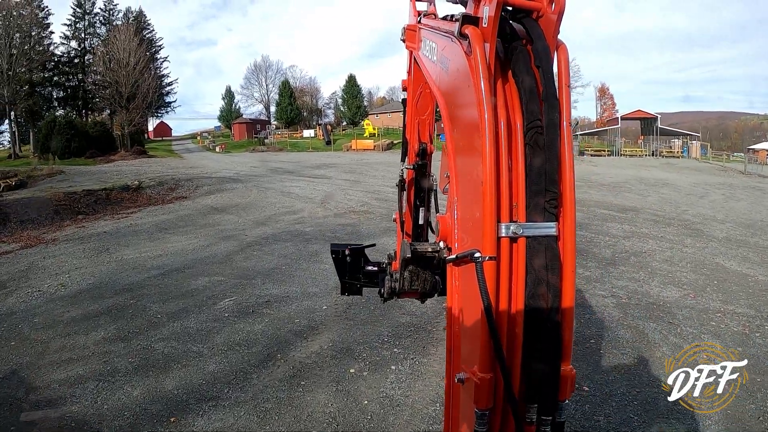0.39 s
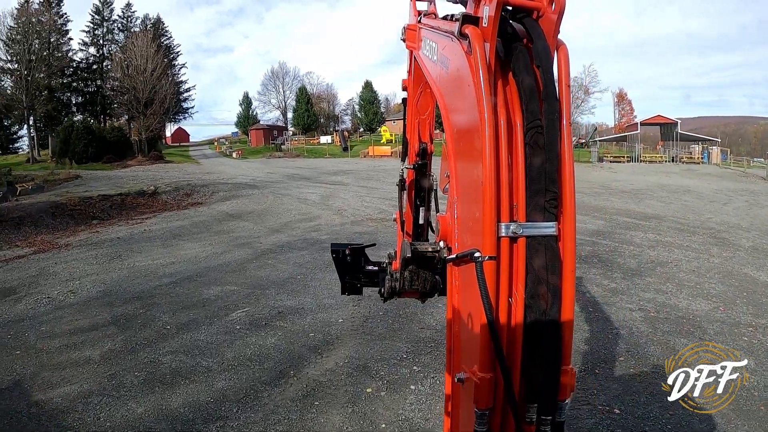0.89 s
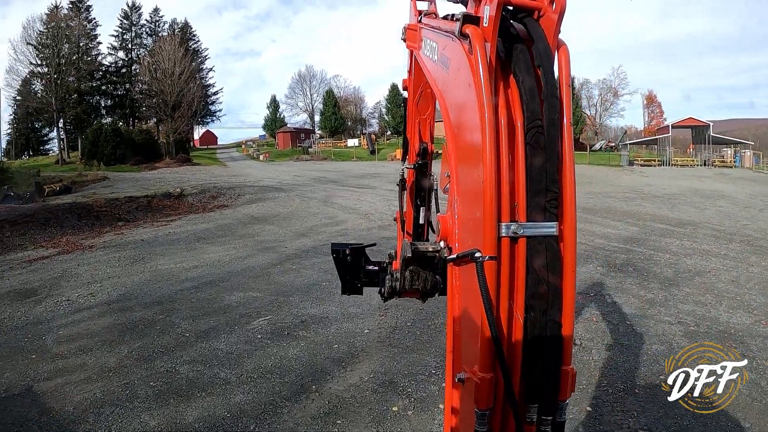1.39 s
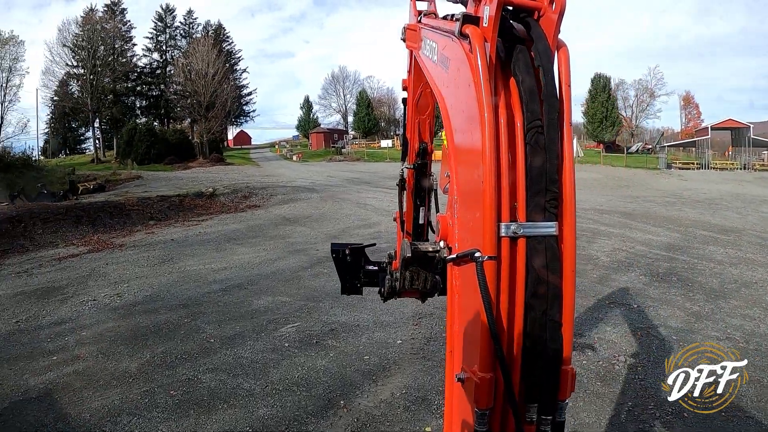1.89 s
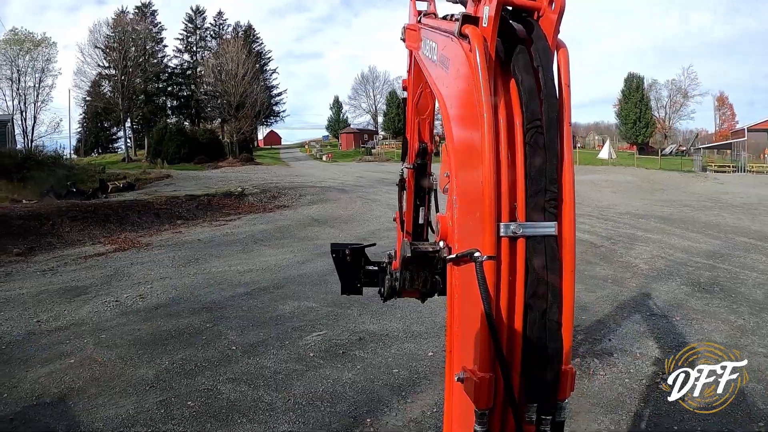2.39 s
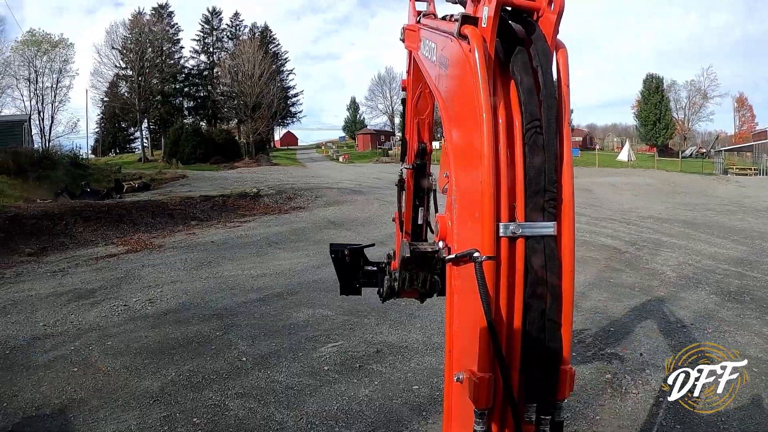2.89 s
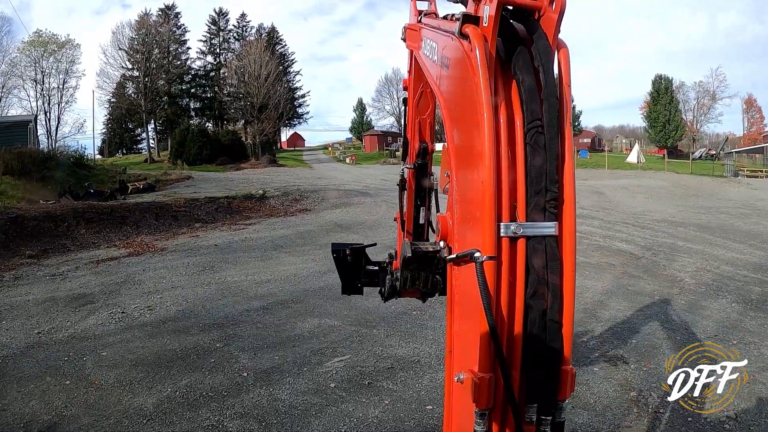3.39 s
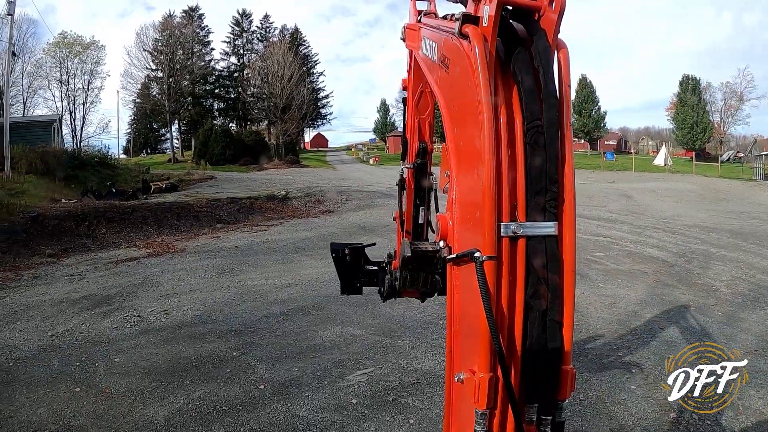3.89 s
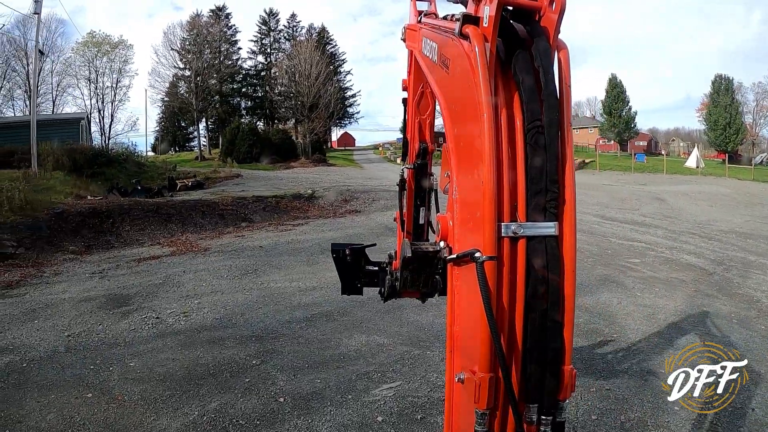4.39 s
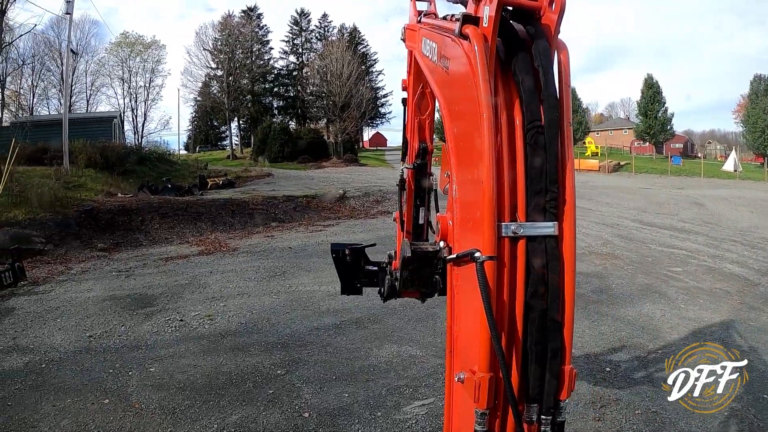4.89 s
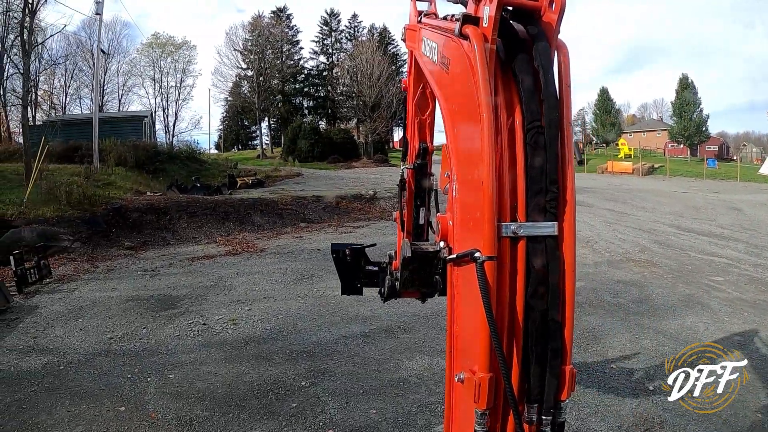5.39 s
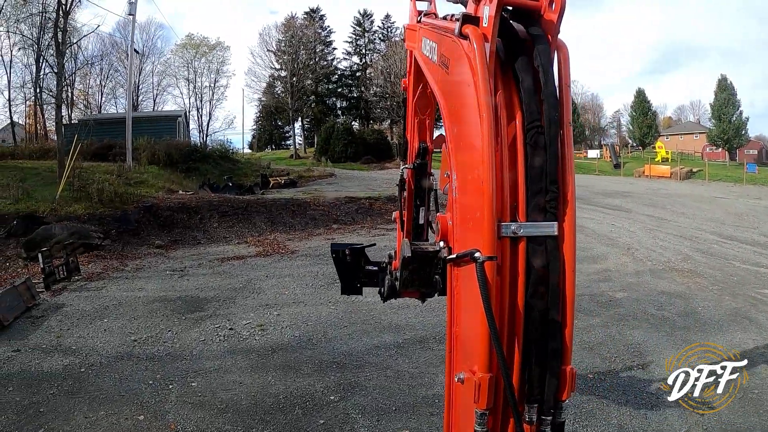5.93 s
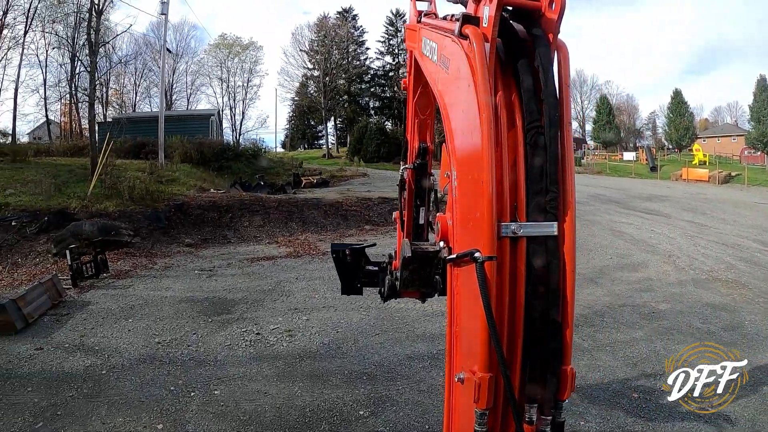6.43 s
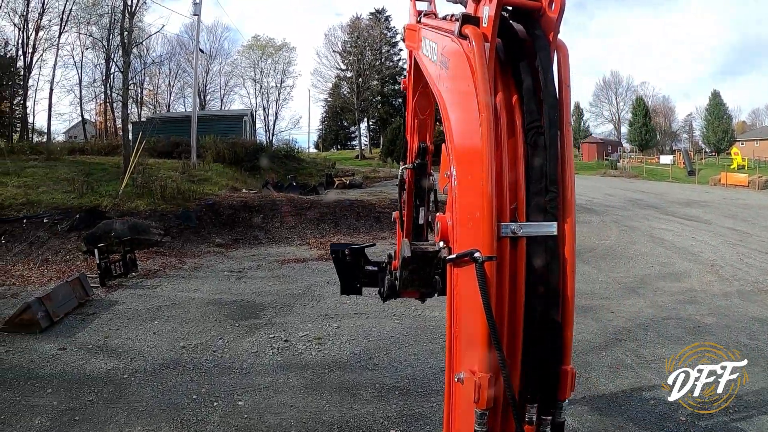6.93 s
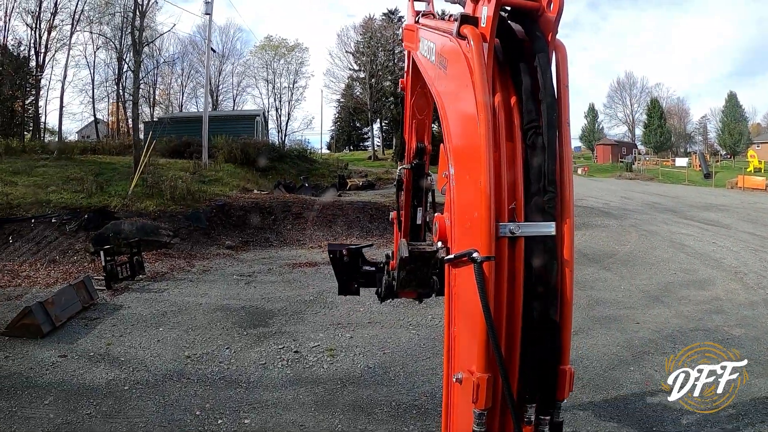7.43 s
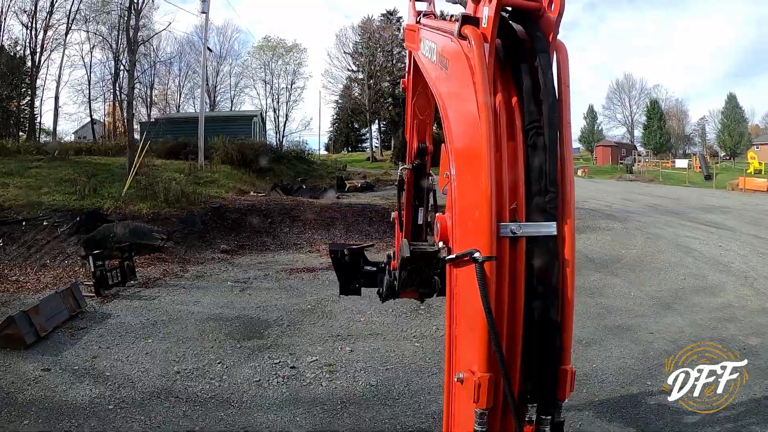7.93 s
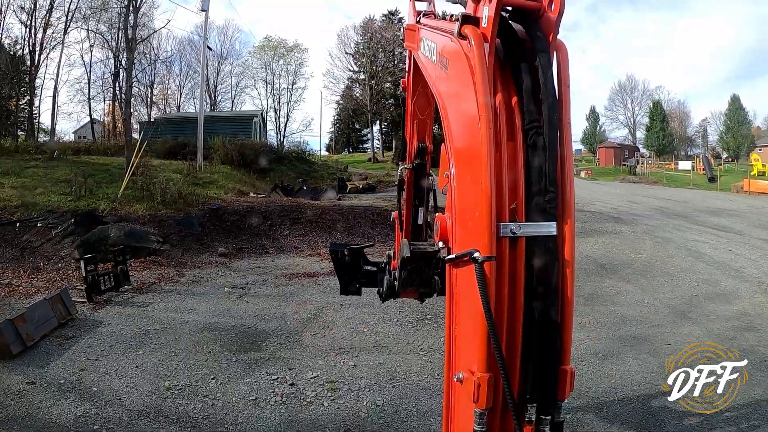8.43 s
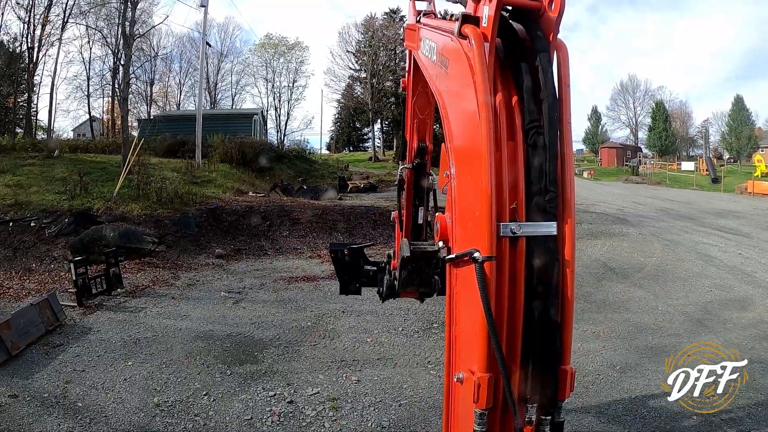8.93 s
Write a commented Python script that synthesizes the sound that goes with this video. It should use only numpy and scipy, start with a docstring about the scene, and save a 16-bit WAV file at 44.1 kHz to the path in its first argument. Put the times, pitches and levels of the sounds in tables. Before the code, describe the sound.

A small three-cylinder diesel runs at a steady speed, heard close from an excavator cab outdoors. Deep firing throb, pump hum and whine, fan and valve clatter blend with rushing air. Loose parts and a panel rattle briefly at first, then the drone smooths out during the swing. Near the end the frame shudders and the rattling returns strongly, then thins to a few taps.

```python
"""On the cab of a small three-cylinder diesel excavator, two microphone ports hear it run at a held speed.
Firing thump, pump tones, fan and valve clatter are phase-locked or geared to the four-stroke cycle.
The frame shakes at its own low pitch, gaining on the thump near 7.8 s as the swing stops; a loose part,
a smaller part and a cab panel are struck at listed times and ring as damped modes.
Noise with shaped spectra gives the rumble, the booming cab walls and the rush of air."""
import sys
import numpy as np
from scipy import signal
from scipy.io import wavfile
from scipy.ndimage import uniform_filter1d

SR = 44100
rng = np.random.default_rng(int(sys.argv[2]) if len(sys.argv) > 2 else 0)


def store_pcm(level_fs):
    """Save levels as 16-bit WAV."""
    pcm = np.round(np.clip(level_fs, -1, 1) * 32767).astype(np.int16)
    wavfile.write(sys.argv[1], SR, np.atleast_2d(pcm).T)


def gain_from_db(level_db):
    """Turn a decibel level (scalar or array-like) into a linear amplitude factor."""
    decades = np.asarray(level_db, float) / 20
    return 10 ** decades


N = 399546
T = np.arange(N) / SR
LEFT_LAG_S = 4e-5  # the left port lies a little farther from the engine


def curve(rows):
    """Linear interpolation in time: every column of a table, read at each sample."""
    s, *columns = np.transpose(rows)
    return [np.interp(T, s, c) for c in columns]


def read(points, hz):
    """Interpolation over pitch: a spectrum table read on a log-frequency axis."""
    f, value = np.transpose(points)
    return np.interp(np.log(hz + 1), np.log(f + 1), value)


def evened(x):
    """Power normalisation: the signal scaled to rms 1."""
    return x / np.sqrt(np.mean(x ** 2) + 1e-20)


def drift(hz):
    """Slow random modulation: a sum of sines up to hz, random in phase, rms 1."""
    t = T[::64]
    rates = np.geomspace(hz / 30, hz, 12)
    slow = sum(np.sin(2 * np.pi * (f * t + rng.random())) / np.sqrt(f) for f in rates)
    return np.interp(T, t, evened(slow))


def tone(turns, db, lean_db, lag_turns=0.):
    """Simple harmonic motion: a sine of rms level db, split in level and phase between the ports."""
    side = np.array([[.5], [-.5]])
    phase = 2 * np.pi * (turns - side * lag_turns)
    return np.sqrt(2) * gain_from_db(db + side * lean_db) * np.sin(phase)


# likeness of the noise at the two ports: (frequency [Hz], correlation [0 to 1])
LIKENESS = [(60, 0.96), (300, 1), (520, 0.94), (890, 0.8), (1520, 0.97), (2600, 0.45), (4000, 0.69),
            (9000, 0.14)]
# level difference between the ports: (frequency [Hz], left minus right [dB])
PORT_LEAN = [(60, 1.0), (200, .5), (320, 2.0), (740, 2.8), (1700, 1.6), (5000, 1.2), (10000, .2)]


def noise(spectrum, size, patchy_db, patch):
    """Partial coherence: random short-time spectra in drifting patches (bins, frames), partly alike."""
    hop, hz = size // 4, np.fft.rfftfreq(size, 1 / SR)
    a, b, c, d, patches = rng.standard_normal((N // hop + 5, len(hz), 5)).T
    patches = uniform_filter1d(patches, size=patch[0], axis=0)
    patches = evened(uniform_filter1d(patches, size=patch[1], axis=1))
    same = np.clip(read(LIKENESS, hz), 0, 1)[:, None]
    left = a + 1j * b
    lead = np.exp(2j * np.pi * hz * LEFT_LAG_S)[:, None]
    right = same * left * lead + np.sqrt(1 - same ** 2) * (c + 1j * d)
    lean = gain_from_db(read(PORT_LEAN, hz) / 2)[:, None]
    colour = gain_from_db(read(spectrum, hz)[:, None] + patchy_db * patches)
    z = np.array([left * lean, right / lean]) * colour
    return evened(signal.istft(z, nperseg=size, noverlap=size - hop)[1][:, :N])


def struck(events, modes, bounce_s):
    """Modal impact: each blow is a short swell of random bounces that excites damped modes."""
    at, db = np.transpose(events)
    blows = np.zeros(N)
    blows[np.round(at * SR).astype(int)] = gain_from_db(db)
    t = np.arange(3000) / SR
    swell = t / bounce_s * np.exp(1 - t / bounce_s)
    bounces = rng.standard_normal((N, 2)).T * signal.oaconvolve(blows, swell)[:N]
    body = sum(gain_from_db(mode_db - 60 * t / t60) * np.sin(2 * np.pi * hz * t) for hz, mode_db, t60 in modes)
    body *= 1 - np.exp(-(t / .0007) ** 2)  # softened onset
    body = body[None] / np.linalg.norm(body)
    at_ports = bounces[0] + .5 * bounces  # the ports hear slightly different bounces
    return signal.oaconvolve(at_ports, body, axes=1)[:, :N]


# load on the hydraulics, highest at 7.7 s and lowest at 8.3 s: (time [s], relative level [dB])
LOAD_CURVE = [(0, 1.5), (.8, 0), (1.6, -0.5), (2.6, -2), (3.9, 2), (4.7, -2.5), (5.5, 0.5), (6.3, 4),
              (7.1, 2), (7.7, 4.5), (8.3, -5.5), (9.06, 2)]


def hydraulic_load():
    """Load modulation: the changing load that raises or lowers the booms and the upper pump tone."""
    return curve(LOAD_CURVE)[0]


# effort of the swing drive: (time [s], gain of locked tones [dB], gain of rush [dB])
SWING_EFFORT = [(0, -1.5, 1), (.45, -0.5, 0.7), (1.8, 0, 0.5), (3.4, -2, -0.2), (4.2, 0.5, 1), (5, -1, 0.1),
                (7.2, -0.5, 1), (7.6, -2, .5), (7.9, -1.5, 1), (8.3, -1, -0.5), (9.06, -2, 1)]


def swing_effort():
    """Effort modulation: the gains that the swing drive gives to the locked tones and the rush."""
    return curve(SWING_EFFORT)


# frame rumble, lower and upper wall boom, a spectrum each: (frequency [Hz], relative density [dB per Hz])
BOOM_SPECTRA = [
    [(8, -18.5), (20, -9.5), (40, -0.5), (70, 2), (85, -26), (113, -4), (135, -15), (300, -21), (400, -17),
     (550, -37.5), (2000, -130)],
    [(120, -48.5), (145, -12), (160, 7.5), (175, 6), (190, -12), (230, -57), (400, -130)],
    [(160, -56.5), (200, 1.5), (240, -2.5), (275, 0), (310, -20.5), (380, -71), (600, -130)],
]
# the same three in order: (level [dB], share of load [dB per dB], slow swell [dB])
BOOM_LEVELS = [(-25, 0.08, 0.5), (-33, 0.84, 0.5), (-34, 0.58, 1.5)]


def booms(load_db):
    """Structure-borne resonance: frame rumble and wall booms follow the load and swell slowly."""
    total = 0
    for spectrum, (db, share, swell_db) in zip(BOOM_SPECTRA, BOOM_LEVELS):
        gain = gain_from_db(db + share * load_db + swell_db * drift(1.2))
        total = total + gain * noise(spectrum, size=4096, patchy_db=0.6, patch=(10, 8))
    return total


# air rush and mechanical clatter: (frequency [Hz], relative density [dB per Hz])
CLATTER_SPECTRUM = [(250, -22.5), (480, -4.5), (600, -8.5), (700, -15.5), (775, -6.5), (845, -15),
                    (890, -12.5), (935, -9.5), (1060, -9.5), (1240, -12.5), (1330, -11), (1500, -13.5),
                    (1680, -14.5), (1800, -15.5), (2030, -17.5), (2300, -23.5), (2600, -27), (3200, -25.5),
                    (3600, -27.5), (4900, -33)]
# the top of the air rush, fading towards the treble: (frequency [Hz], relative density [dB per Hz])
RUSH_TOP_SPECTRUM = [(5500, -38), (7000, -40), (8500, -42), (9300, -51), (10400, -53), (11000, -59),
                     (12300, -60), (14000, -70), (16000, -85)]


def clatter(cycles, rush_db):
    """Amplitude-modulated turbulence: the rush of air and valve gear puffs at each firing."""
    puff = 1 + .2 * np.exp(-((3 * cycles + .3) % 1) / .2)
    puff = uniform_filter1d(uniform_filter1d(puff, size=60), size=60)  # each puff takes a moment to rise
    rush = noise(CLATTER_SPECTRUM + RUSH_TOP_SPECTRUM, size=2048, patchy_db=1.8, patch=(3, 24))
    return gain_from_db(-37 + rush_db + 0.2 * drift(2.5)) * evened(rush * puff)


# ticks of the small part: (time [s], relative level [dB])
TICK_TIMES = [(0.039, -47), (7.946, -50), (7.962, -52), (8.024, -51), (8.1032, -51), (8.1846, -53),
              (8.2635, -52.5)]
# its modes: (frequency [Hz], relative level [dB], 60 dB decay time [s])
SMALL_PART_MODES = [(4300, -3, .004), (5200, 0, .004), (5900, -3, .004), (6600, -4, .004), (7600, -9, .004)]


def small_part_ticks():
    """Modal ringing of a light body: high modes that die within milliseconds."""
    return gain_from_db(-6.0) * struck(TICK_TIMES, SMALL_PART_MODES, bounce_s=0.0022)


# knocks of the loose part: (time [s], relative level [dB])
LOOSE_PART_TAPS = [(.037, -28), (.11, -25), (.15, -29), (.186, -26), (.23, -29), (.262, -24), (.325, -25.5),
                   (7.488, -26), (7.56, -29), (7.639, -27), (7.678, -28), (7.72, -25), (7.759, -22.5),
                   (7.796, -26), (7.838, -24.5), (7.881, -23.5), (7.919, -25), (7.96, -22), (7.998, -25),
                   (8.045, -25), (8.078, -25), (8.122, -26), (8.159, -27), (8.203, -28), (8.709, -27),
                   (8.792, -28), (8.909, -26.5), (8.951, -28), (8.993, -28)]
# its modes: (frequency [Hz], relative level [dB], 60 dB decay time [s])
LOOSE_PART_MODES = [(750, -4, .015), (1050, -2, .012), (1400, 0, .014), (1700, -1, .01), (2100, -5, .01),
                    (2800, -11, .008), (3400, -12, .008), (4300, -16, .006), (5200, -21, .005)]


def loose_part_knocks():
    """Modal ringing under repeated impact: the loose part rattles in the middle of the spectrum."""
    return gain_from_db(-13) * struck(LOOSE_PART_TAPS, LOOSE_PART_MODES, bounce_s=.005)


# thuds of the cab panel: (time [s], relative level [dB])
PANEL_THUDS = [(.02, -26), (.07, -26), (.112, -21), (.135, -24), (.186, -22), (.22, -26), (.262, -25),
               (.325, -26), (.758, -27), (.841, -29), (5.331, -28), (7.367, -29), (7.68, -28), (7.72, -27),
               (7.76, -27), (7.796, -24), (7.838, -26), (7.881, -24), (7.92, -26), (7.96, -23), (8.0, -26),
               (8.045, -24), (8.08, -27), (8.12, -27)]
# its modes: (frequency [Hz], relative level [dB], 60 dB decay time [s])
PANEL_MODES = [(420, -1, .05), (470, 0, .05), (530, -3, .04), (600, -7, .03)]


def panel_thuds():
    """Plate resonance: low, longer modes of the cab panel answer each thud."""
    return gain_from_db(-6.5) * struck(PANEL_THUDS, PANEL_MODES, bounce_s=.004)


# the frame on its mounts: (time [s], frequency [Hz], relative level [dB])
FRAME_SHAKE = [(0, 24.9, -29), (1.05, 25.07, -36.5), (1.4, 25.9, -20.5), (1.9, 25.5, -22),
               (2.6, 25.16, -19), (3, 25.17, -17), (3.25, 25.13, -26.5), (3.5, 25.4, -13),
               (3.87, 26.05, -26), (4.1, 25.94, -17), (4.4, 24.91, -18), (4.8, 25.67, -15.5),
               (5.7, 24.76, -24), (6, 24.57, -20.5), (6.7, 24.7, -27), (7.3, 24.47, -18.5),
               (7.55, 24.42, -17.5), (7.8, 24.91, -8), (8.45, 25.47, -17), (9.06, 26.14, -14)]


def frame_shake():
    """Mass-spring oscillation: the frame sways on its mounts as one low sine of wandering pitch."""
    shake_hz, shake_db = curve(FRAME_SHAKE)
    return tone(np.cumsum(shake_hz) / SR, shake_db + 0.46 * drift(6.9), 1.0)


# engine speed: (time [s], four-stroke cycle rate [Hz])
CYCLE_RATE = [(0.0, 15.698), (0.3, 15.705), (0.6, 15.709), (0.9, 15.708), (1.2, 15.716), (1.5, 15.743),
              (1.8, 15.775), (2.1, 15.792), (2.4, 15.789), (2.7, 15.771), (3.0, 15.75), (3.3, 15.726),
              (3.6, 15.706), (3.9, 15.71), (4.2, 15.738), (4.5, 15.764), (4.8, 15.77), (5.1, 15.752),
              (5.4, 15.73), (5.7, 15.72), (6.0, 15.718), (6.3, 15.718), (6.6, 15.719), (6.9, 15.713),
              (7.2, 15.691), (7.5, 15.664), (7.8, 15.648), (8.1, 15.641), (8.4, 15.637), (8.7, 15.628),
              (9.06, 15.618)]


def engine_cycles():
    """Phase as the integral of frequency: four-stroke cycles turned so far."""
    return np.cumsum(curve(CYCLE_RATE)[0]) / SR


# strong tones locked to the cycle, from pumps, valves and knock: (multiple of the cycle, relative level [dB])
STRONG_ORDERS = [(2, -35), (6, -45), (9, -50), (10, -40), (15, -39), (16, -40), (19, -50), (20, -35),
                 (21, -49), (22, -50), (23, -52), (27, -51), (28, -50), (30, -54), (32, -52), (34, -57),
                 (36, -46.5), (37, -54), (38, -51), (39, -47), (40, -58), (41, -59), (42, -50), (43, -51),
                 (44, -54), (45, -50.5), (46, -60), (47, -60), (48, -63), (50, -53), (52, -53), (53, -58),
                 (55, -55), (56, -57), (57, -58), (59, -61), (60, -57), (62, -59), (65, -58), (66, -52),
                 (67, -53), (68, -57), (69, -62), (70, -62), (72, -54), (77, -63), (80, -57), (81, -65),
                 (84, -57), (86, -61), (92, -65), (93, -57), (96, -65), (100, -55), (106, -68), (107, -64),
                 (108, -60), (112, -68), (114, -64), (116, -65), (117, -61), (118, -66), (121, -69),
                 (122, -65), (124, -63), (128, -70), (129, -70), (130, -60), (132, -72), (133, -69),
                 (136, -73), (140, -73), (150, -76), (153, -76), (154, -78), (167, -80), (175, -74),
                 (180, -75), (183, -78), (201, -79), (209, -78)]
# injector, valve and combustion knocks: (place in the cycle [share], relative level [dB])
CYCLE_KNOCKS = [(.0917, -6), (.2215, -6), (.2387, -6), (.3391, -6), (.3719, -6), (.4366, -6), (.612, -6),
                (.6675, -6), (.9497, -2)]


def engine_pattern(cycles):
    """Fourier series of a periodic source: one cycle repeats, its knocks timing strong and faint tones."""
    angle, out = np.arange(8192) / 8192, np.zeros((2, N))
    cycle_hz = CYCLE_RATE[1][1]
    at, knock_db = np.transpose(CYCLE_KNOCKS)
    strong = dict(STRONG_ORDERS)
    orders = sorted(set(strong) | set(range(25, 290)))
    chance = rng.standard_normal((len(orders), 3))
    groups = 4  # neighbouring tones swell apart from one another
    for g in range(groups):
        shape = 0
        for k, (late, lean, size) in list(zip(orders, chance))[g::groups]:
            hz = k * cycle_hz
            faint_db = -59 + read(CLATTER_SPECTRUM, hz) + 3.5 * size  # coloured like the clatter
            knock_sum = np.sum(gain_from_db(knock_db) * np.exp(-2j * np.pi * k * at))
            start = np.angle(knock_sum) / (2 * np.pi)
            smear = .04 if k in strong else .2  # random phase [turns]
            lean_db = read(PORT_LEAN, hz) + 2.5 * lean * min(hz / 500, 1)
            shape = shape + tone(k * angle + start + smear * late, strong.get(k, faint_db),
                                 lean_db, hz * LEFT_LAG_S)
        played = [np.interp(cycles % 1, angle, port, period=1) for port in shape]
        out += gain_from_db(0.9 * drift(6.5)) * np.array(played)
    return out


# pressure pulse of the six-tooth pump: (time [s], level [dB])
PUMP_PULSE = [(0, -27.5), (1, -29.5), (2.4, -30), (3.3, -31.5), (3.9, -27), (4.4, -31.5), (5.1, -31.5),
              (5.5, -27.5), (6.2, -30), (6.6, -26), (7.05, -25.5), (7.3, -32.5), (8, -30.5), (8.5, -34),
              (9.06, -32)]


def engine_tones(cycles, load_db):
    """Order tones: three firings a cycle, a six-tooth pump at crank speed, its octave, a belt-driven fan."""
    tooth_db = curve(PUMP_PULSE)[0]
    octave_db = -28.5 + 0.33 * load_db + .7 * drift(3)  # a third of a dB for each dB of load
    firing = tone(3 * cycles - .21 + .02 * drift(12), -15 + .5 * drift(10), 1.0, lag_turns=.003)
    tooth = tone(12 * cycles - .22 + .015 * drift(15), tooth_db + .8 * drift(12), .7)
    octave = tone(24 * cycles + 1 / 4, octave_db + 0.8 * drift(12), 1.9, lag_turns=0.022)
    # belt-driven, so not a whole multiple
    fan = tone(13.9 * cycles + .05 * drift(4), -41 + 1.5 * drift(3), .7)
    return firing + tooth + octave + fan


def scene():
    """Superposition: all sources add at the two microphone ports."""
    cycles, load_db = engine_cycles(), hydraulic_load()
    tones_db, rush_db = swing_effort()
    background = booms(load_db) + clatter(cycles, rush_db)
    rattles = small_part_ticks() + loose_part_knocks() + panel_thuds()
    engine = gain_from_db(tones_db) * engine_pattern(cycles) + engine_tones(cycles, load_db)
    return background + rattles + frame_shake() + engine


def levelled_bass(x):
    """Automatic gain control: the smoothed power of the bass alone is held at one level."""
    bass_hz, bass_db, hold_s = 61, -15, 0.11
    bass = signal.sosfiltfilt(signal.butter(4, bass_hz, fs=SR, output="sos"), x)
    span = int(hold_s * SR)
    power = uniform_filter1d(uniform_filter1d((bass ** 2).mean(0), span), span)
    return x + bass * (gain_from_db(bass_db) / np.sqrt(power + 1e-9) - 1)


def roll_off(x):
    """The treble ends steeply here."""
    return signal.sosfilt(signal.butter(12, 15700, fs=SR, output="sos"), x)


def record(dry):
    """Saturation: the bass is levelled, then the input stage gently squeezes the peaks."""
    ceiling = .75  # where the input stage flattens (full scale 1)
    mix = ceiling * np.tanh(levelled_bass(dry) / ceiling)
    return roll_off(mix)


dry = scene()
out = record(dry)
store_pcm(out)
```